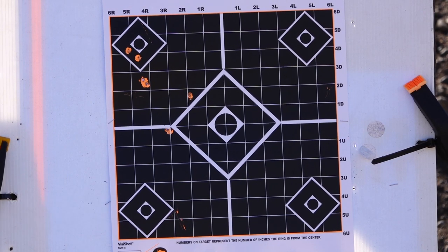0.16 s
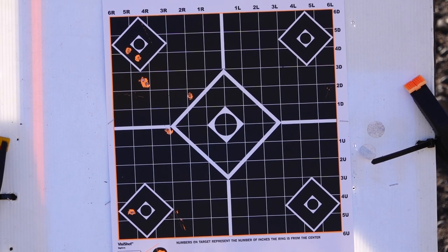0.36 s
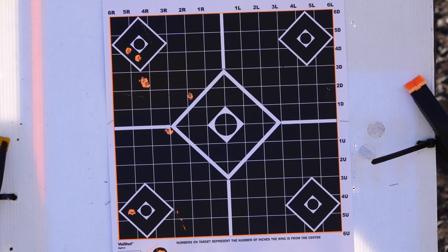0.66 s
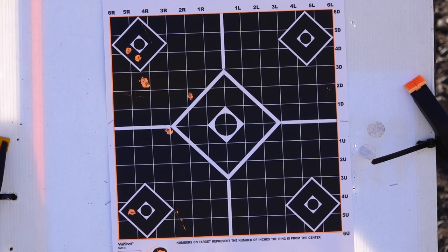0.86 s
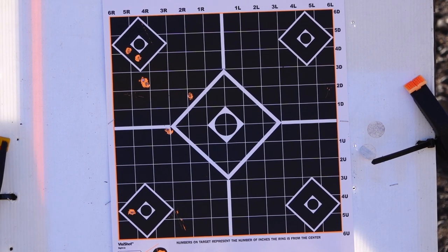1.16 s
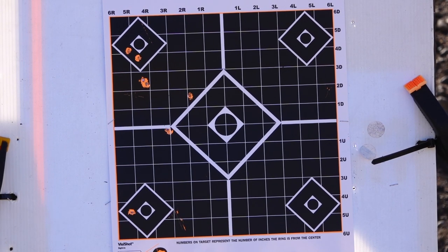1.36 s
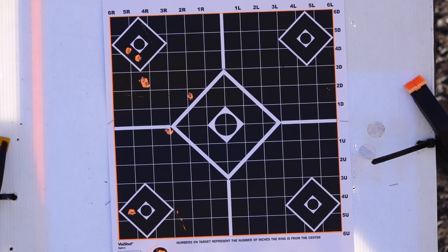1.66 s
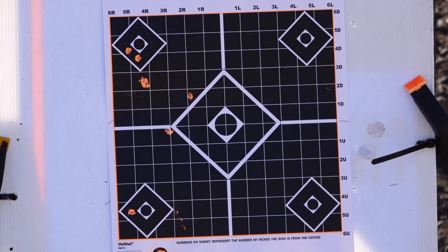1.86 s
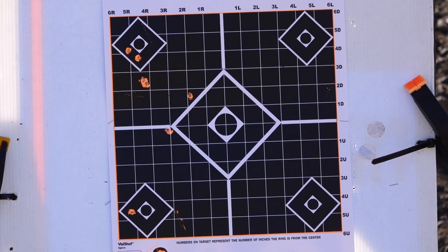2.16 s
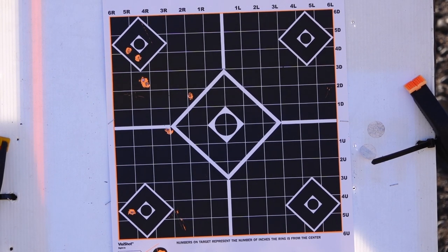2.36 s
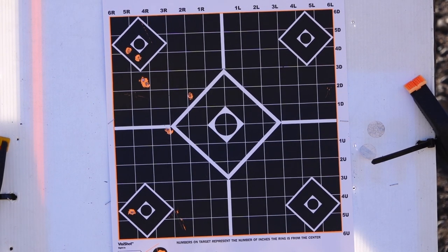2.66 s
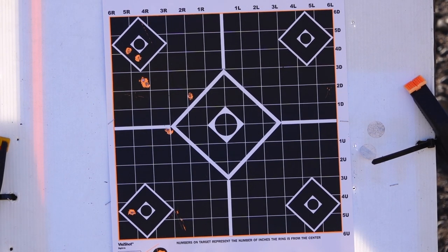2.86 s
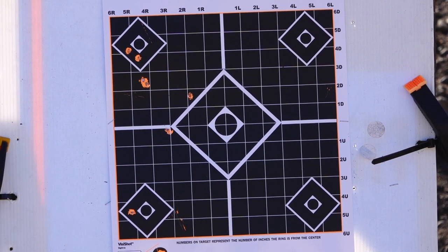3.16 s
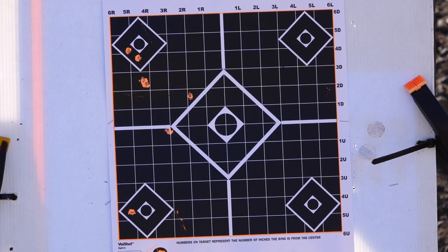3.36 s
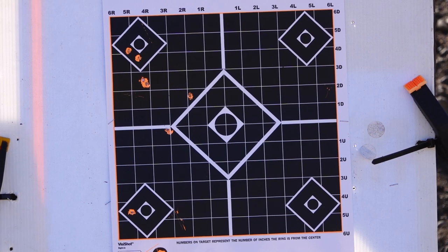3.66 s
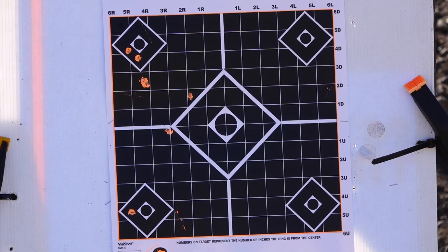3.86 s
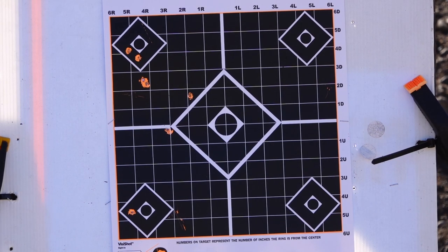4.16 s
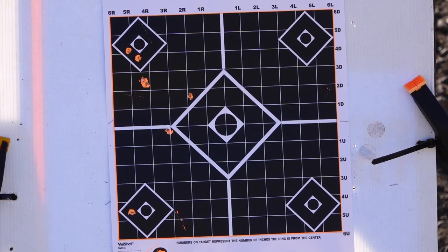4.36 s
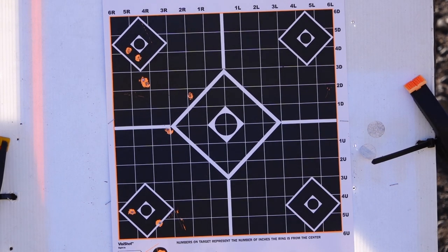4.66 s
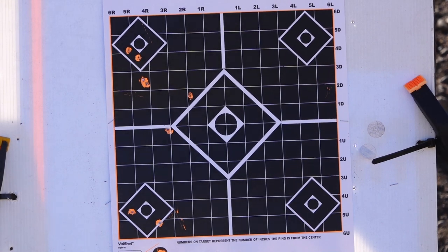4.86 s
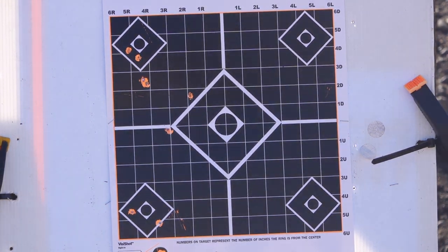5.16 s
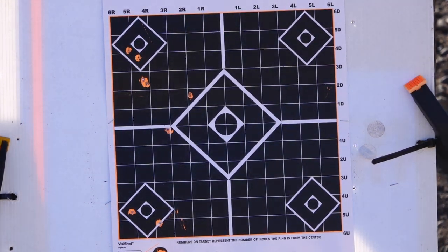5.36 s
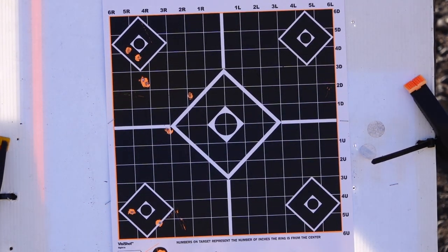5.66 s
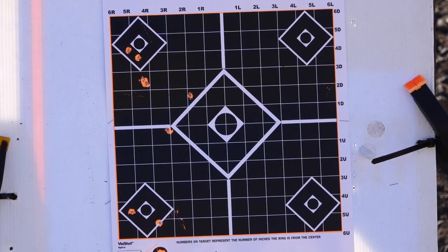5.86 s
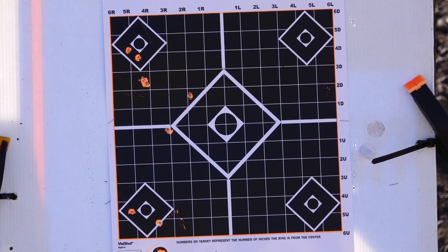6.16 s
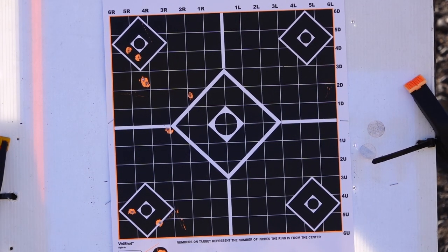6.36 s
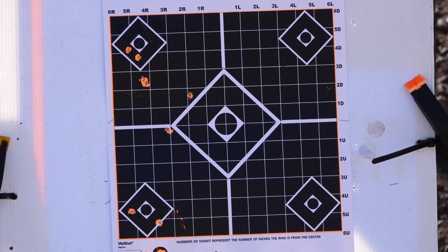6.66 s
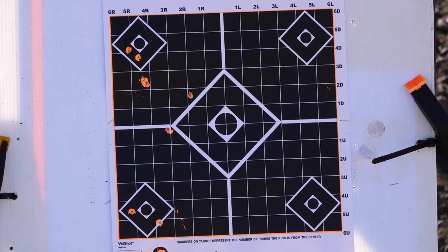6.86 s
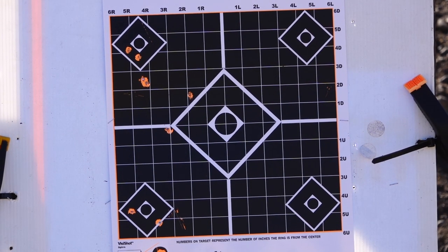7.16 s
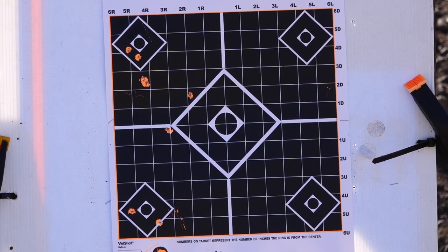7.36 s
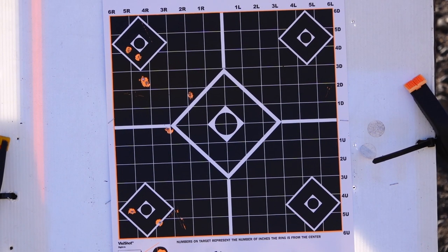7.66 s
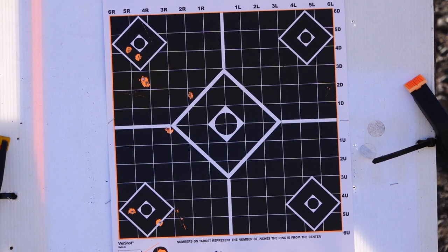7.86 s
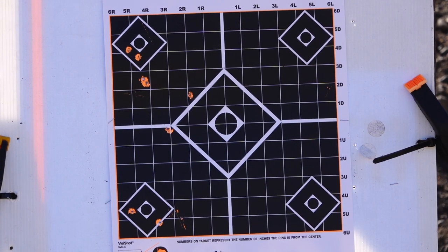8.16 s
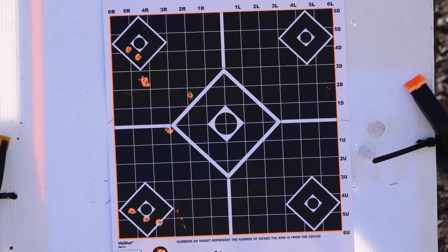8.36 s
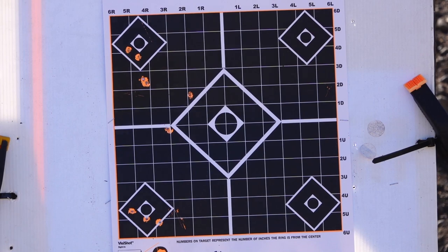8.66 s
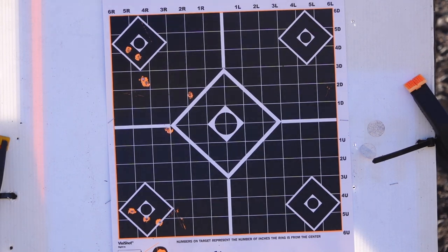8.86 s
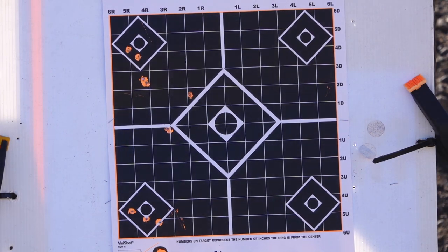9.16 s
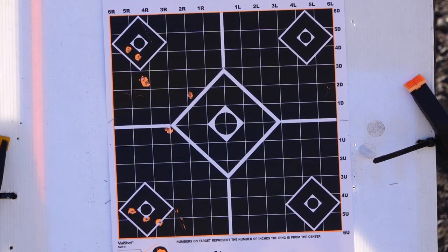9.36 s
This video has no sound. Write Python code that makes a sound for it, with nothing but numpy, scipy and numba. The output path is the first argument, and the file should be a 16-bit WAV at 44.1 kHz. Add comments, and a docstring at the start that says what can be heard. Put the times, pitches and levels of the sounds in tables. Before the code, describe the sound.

A small revolver is fired three times outdoors, close to the microphone, at about 0.4, 4.5 and 8.3 seconds. Each shot is a loud, sharp crack that overloads briefly, slaps back off nearby surfaces and trails away in a fainter, duller echo over about two seconds. The trigger clicks roughly 0.2 seconds after each shot. Then the hammer is cocked with a barely audible scrape and two crisp steel clicks plus smaller ticks, at about 1.2, 5.3 and 9.0 seconds. Small birds whistle very faintly in the distance from 2.2 to 4.1 seconds and chirp briefly again around 6.6. Low wind rumbles on the microphone, with soft thumps between 3.5 and 4 seconds; it holds until about 6.3, eases, then returns lightly toward the end at around 9.5 seconds. A very faint, distant rustle lies underneath throughout.

```python
"""Revolver at an outdoor range

A phone microphone stands beside a small revolver fired three times. Each blast overloads it, then
comes back off nearby boards, a bank and far trees, much the same every time, duller with distance.
Close up, the steel action clicks between shots and wind buffets the microphone.
Far off, small birds whistle over a faint rustle."""
import sys
import numpy as np
from scipy import signal
from scipy.fft import rfft, irfft, next_fast_len
from scipy.io import wavfile
from scipy.ndimage import uniform_filter1d
from numba import njit

SR = 44100
rng = np.random.default_rng(int(sys.argv[2]) if len(sys.argv) > 2 else 0)


def master(y):
    """Save y as 16-bit WAV."""
    cut = np.clip(np.atleast_2d(y).T, -1, 1)
    pcm = np.round(cut * 32767)  # scale
    wavfile.write(sys.argv[1], SR, pcm.astype(np.int16))


N = 418950

# spectrum of the distant rustle: freq_hz, gain_db
RUSTLE_SPECTRUM = [(88, -33.5), (150, -8.5), (291, -13.5), (334, -12), (805, -16), (1940, -22), (2400, -24),
                   (5050, -28.5), (16000, -33)]
# strength of the wind on the microphone: time_s, level_db
WIND_LEVELS = [(0, -63), (0.301, -58.5), (.75, -56), (2.3, -53.5), (2.999, -58), (3.299, -42.5),
               (3.701, -43), (3.851, -32), (4.151, -40.5), (4.35, -34), (4.751, -38.5), (4.88, -30),
               (5.299, -31), (6.249, -32), (7.2, -53.5), (7.348, -41.5), (7.901, -41.5), (9.5, -36)]
# single low buffets, and a low knock at 1.385 s: start_s, level_db, pitch_hz
LOW_THUMPS = [(1.385, -29, 290), (3.506, -17.5, 69.5), (3.857, -20, 93), (3.945, -23, 56.9),
              (6.85, -33, 69.8), (8.861, -25.5, 73.1)]
# whistled bird notes: start_s, length_s, level_db, first_hz, middle_hz, last_hz
BIRD_WHISTLES = [(2.219, .185, -59.5, 2350, 2353, 2175), (2.418, 0.035, -62, 1830, 1795, 1850),
                 (2.444, 0.092, -63, 1830, 2170, 2300), (2.52, 0.034, -60, 1850, 1840, 1920),
                 (2.551, 0.15, -60, 2000, 2340, 2530), (2.53, .08, -71, 4400, 3950, 3097),
                 (3.071, 0.083, -64, 3145, 3000, 2874), (3.278, 0.063, -56, 2870, 2816, 2890),
                 (3.289, 0.072, -62, 2260, 2850, 3480), (3.296, .1, -62, 1323, 1393, 1350),
                 (3.36, 0.044, -54.5, 2450, 2340, 2320), (3.385, 0.089, -60, 3600, 3690, 3900),
                 (3.46, 0.28, -62, 2730, 2620, 2545), (3.494, .06, -52, 2700, 2760, 2450),
                 (3.5, 0.055, -65, 5550, 5400, 4950), (3.708, 0.089, -60, 2820, 2660, 2260),
                 (3.723, 0.06, -66, 5390, 5300, 4880), (3.783, 0.069, -61, 2250, 2356, 2650),
                 (3.863, .27, -70, 2630, 2620, 2620), (6.501, .02, -62.5, 3630, 3780, 3800),
                 (6.612, 0.013, -54, 2370, 3700, 4950), (6.622, .034, -62, 5700, 5700, 5430),
                 (6.673, 0.04, -63, 1770, 1990, 2350)]
# raspy bird calls: start_s, length_s, level_db, first_hz, middle_hz, last_hz
BIRD_RASPS = [(6.52, 0.06, -61.5, 1207, 1443, 1490), (6.575, 0.039, -57, 1404, 1440, 1470)]
# modes of the steel frame: pitch_hz, level_db, t60_s
FRAME_MODES = [(1400, -24, 0.008), (2030, -20, 0.012), (3055, 9.5, 0.0076), (4250, 0, 0.006),
               (5380, 4, .006), (7600, -12, 0.0041), (9350, -32, 0.027), (10100, -15.5, 0.0047)]
# trigger let go, hammer drawn, hammer locks, grip settles twice: peak_db, tilt_db_per_octave, rattle_ms
ACTION_STEPS = [(3.5, -7.5, 1.17), (-0.2, 6.5, 1.22), (-0.5, -7, 2.06), (-19.5, -8, 1.52), (-31, -13, 0.8)]
# when those steps fall, a row a shot: trigger_s, draw_s, lock_s, settle_s, resettle_s
ACTION_TIMES = [(.5237, 1.1519, 1.2186, 1.3625, 1.4057), (4.6725, 5.241, 5.2998, 5.411, 5.4623),
                (8.4792, 8.989, 9.044, 9.182, 9.2258)]
# stray ticks of loose parts: start_s, peak_db, tilt_db_per_octave
LOOSE_TICKS = [(0.5473, -16.5, -3), (.551, -8, 8.5), (.5668, -22, -9), (0.5733, -11.5, -12),
               (1.066, -32.5, -8), (1.104, -32, 6), (1.3908, -30, 0), (1.4573, -31.5, -6),
               (4.6931, -12, -2), (4.6966, -5.5, 6), (4.7058, -12, -5), (5.202, -27.5, 0),
               (5.214, -30.5, 2), (8.498, -25, -9), (8.502, -16.5, 4), (8.5049, -14.5, -7),
               (8.8754, -22, 9), (8.959, -26, -4)]
# hammer fall ahead of each blast: lead_s, peak_db, tilt_db_per_octave
HAMMER_FALL = [(0.0105, -22.5, -6.5), (0.0022, -2.5, 0.6)]
# spectrum of the blast: freq_hz, gain_db
BLAST_SPECTRUM = [(60, -30), (280, -16.5), (450, -7), (900, -3), (2000, 0), (3100, -1), (3700, -3.5),
                  (4400, -2.5), (7000, -4.5), (15000, -19)]
# the muzzle's bright crack and darker body, then what scatters its blast: boards, open ground, shelter, bank
# face, bank top, # rising ground, far trees: delay_s, level_db, rise_db_per_s, hold_s, fall_db_per_s,
# tilt_db_per_octave
BLAST_PATHS = [(0.0005, 3, 9000.5, 0.002, 2500, 2.5), (.004, 3.5, 9000.5, 0.0086, 2100, -1),
               (0.034, -24.5, 902, .056, 600, 1.17), (0.105, -39.5, 300, .03, 149.5, 2),
               (0.062, -19, 1499.5, .012, 419.5, -1.5), (0.258, -26.5, 290.5, .012, 79.5, 2.5),
               (.35, -25.5, 110, .07, 200, -3.5), (0.47, -34, 61.5, .1, 36, -0.5),
               (1.1, -45.5, 45.5, .25, 24, -1.5)]
# distinct echoes off single surfaces: delay_s, level_db, centre_hz
SURFACE_ECHOES = [(.047, -0.5, 1150), (.0465, -1.5, 3100), (.054, -7, 4200), (.066, -16, 1000),
                  (.111, -17.5, 2540), (.121, -23.5, 2952), (.141, -28.5, 2370), (.252, -16, 577),
                  (.257, -11, 1860), (.292, -15, 1950), (.41, -27.5, 1211), (0.506, -24, 810),
                  (0.681, -31, 883), (.815, -32, 1110)]
# the shots: start_s, level_db, thump_db
GUNSHOTS = [(.351, 3.5, -7), (4.483, 4, -14.5), (8.283, 4, -12.5)]

RUSTLE_DB = -60.5
RASP_HARMONICS_DB, RASP_FLUTTER_DB = (-3, 3, 0), 2
SCRAPE_S, SCRAPE_HZ, SCRAPE_DB = 0.27, 2850, -50
RIDGE_DELAY_S, RIDGE_SPREAD_S, RIDGE_HZ, RIDGE_DB = 3.1, .3, 1280, -68
TAIL_S, AIR_LOSS_DB_PER_S = 2.9, 36.5  # loss at 8 kHz
LEAF_HZ, HOLLOW_HZ = 3620, 300  # the far trees return a leafy band and a low boom
ECHO_CYCLES, SMEAR_MS_PER_S = 1.9, 4.5  # an echo lasts a few cycles, longer from far away
PHONE_TOP_HZ = 15700


def undb(db):
    """Decibels to amplitude."""
    return 10 ** (np.asarray(db) / 20)


def unit(x):
    """Scales x to rms 1."""
    return x / np.sqrt(np.mean(x ** 2))


def add(out, x, start_s):
    """Mixes x into out from start_s."""
    i = int(start_s * SR)
    out[i:i + len(x)] += x[:len(out) - i]


def band(n, hz, octaves):
    """Noise of rms 1 in a bell-shaped band."""
    f = np.maximum(np.fft.rfftfreq(n, 1 / SR), 1)
    bell = np.exp(-(np.log2(f / hz) / octaves) ** 2)
    magnitude = bell * np.sqrt(rng.exponential(size=len(f)))
    return unit(irfft(magnitude * np.exp(2j * np.pi * rng.random(len(f))), n))


def walk(n, rate_hz):
    """Smooth random drift with a spread near 1."""
    hold = int(SR / rate_hz)
    steps = np.repeat(rng.standard_normal(n // hold + 1), hold)
    return 1.3 * uniform_filter1d(uniform_filter1d(steps, hold), hold)[:n]


def colour(x, spectrum):
    """Filters x by (freq_hz, gain_db) points."""
    hz, db = np.transpose(spectrum)
    f = np.maximum(np.fft.rfftfreq(len(x), 1 / SR), 1)
    return irfft(rfft(x) * undb(np.interp(np.log(f), np.log(hz), db)), len(x))


@njit
def lowpass(x, hz, damping):
    """State-variable low-pass with a moving corner."""
    y, band_state, low_state = np.empty(len(x)), 0., 0.
    for i in range(len(x)):
        g = np.tan(np.pi * hz[i] / SR)
        bandpassed = (band_state + g * (x[i] - low_state)) / (1 + g * (g + damping))
        y[i] = low_state + g * bandpassed
        band_state, low_state = 2 * bandpassed - band_state, 2 * y[i] - low_state
    return y


def distant_rustle():
    """Far across the range, a rustle swells over a smooth hiss."""
    out, swell = np.zeros(N), walk(N, .6)
    for hz in 150 * 2 ** np.arange(0, 7, .5):
        drift_db = (swell + walk(N, 4.8)) * min(800 / hz, 1)
        out += np.sqrt(hz) * undb(drift_db) * band(N, hz, 0.45)
    return undb(RUSTLE_DB) * unit(colour(out, RUSTLE_SPECTRUM))


def bird_note(length_s, pitches, harmonics_db):
    """The harmonics of one wavering note that bends through three pitches."""
    progress = np.arange(0, 1, 1 / length_s / SR)
    glide_hz = np.polyval(np.polyfit([0, .5, 1], pitches, deg=2), progress)
    turns = np.cumsum(glide_hz * (1 + .009 * walk(len(progress), 120))) / SR
    fade = np.clip(np.minimum(progress, 1 - progress) * length_s / 0.0021, 0, 1)
    return [fade * undb(db) * np.sin(2 * np.pi * k * turns) for k, db in enumerate(harmonics_db, 1)]


def far_birds():
    """Near-sine whistles and a raspier voice rich in harmonics, blurred by the trees."""
    out = np.zeros(N)
    for start_s, length_s, db, *pitches in BIRD_WHISTLES:
        add(out, bird_note(length_s, pitches, [db])[0], start_s)
    for start_s, length_s, db, *pitches in BIRD_RASPS:
        harmonics = bird_note(length_s, pitches, db + np.array(RASP_HARMONICS_DB))
        n = len(harmonics[0])
        breath = undb(db) * band(n, 2570, 0.9) * np.hanning(n)
        voice = sum(x * undb(RASP_FLUTTER_DB * walk(n, 120)) for x in harmonics)
        add(out, breath + voice, start_s)
    out *= undb(3 * walk(N, 90) - 2)  # notes break up on the way
    trees = rng.standard_normal(SR // 2) * 1000. ** (-np.arange(SR // 2) / SR / 0.4)
    return out + undb(-41) * signal.fftconvolve(out, trees)[:N]


def thump(db, hz):
    """A cycle or two of low-pitched pressure on the microphone."""
    turns = np.arange(0, 5, hz / SR)
    return undb(db) * np.sin(2 * np.pi * turns) * 2 * turns * np.exp(1 - 2 * turns)


def wind_on_microphone():
    """Eddies thump the microphone port in lumps; faster air reaches higher."""
    gust_db = np.interp(np.arange(N) / SR, *np.transpose(WIND_LEVELS)) + 3.2 * walk(N, 16)
    corner_hz = np.clip(55 * undb(0.2 * (gust_db + 38.5)), 15, 300)
    rumble = lowpass(rng.standard_normal(N), corner_hz, damping=0.89)
    rumble = lowpass(rumble, 2.2 * corner_hz, damping=1.2)
    out = unit(rumble / np.sqrt(corner_hz)) * undb(gust_db)
    for start_s, db, hz in LOW_THUMPS:
        add(out, thump(db, hz), start_s)
    return out


def steel_click(peak_db, tilt, rattle_ms=1.1):
    """Steel parts meet in a brief rattle that rings the frame; the bench sends back a faint smear."""
    t = np.arange(3000) / SR
    contact = rng.standard_normal(len(t)) * np.exp(-(1000 * t / rattle_ms - 1) ** 2)
    contact[50] += 6.0  # the main blow
    ring = np.zeros(len(t))
    for hz, db, t60_s in FRAME_MODES:
        detune, stray_db = rng.standard_normal(2) * [.015, 2]  # no two blows ring alike
        gain = undb(db + stray_db + tilt * np.log2(hz / 3000))
        ring += gain * np.sin(2 * np.pi * hz * (1 + detune) * t) * 1000. ** (-t / t60_s)
    snap = band(len(t), 4000, 0.8) * np.exp(-((t - .0016) / 0.002) ** 2)
    click = unit(np.convolve(contact, ring)[:len(t)]) + undb(-8) * unit(snap)
    click = signal.lfilter(*signal.butter(2, 1600, "high", fs=SR), click)  # small parts give little bass
    smear = undb(-40) * band(len(t), 5000, 1.6) * np.exp(-((t - .010) / 0.0084) ** 2)
    return undb(peak_db) * (click / np.abs(click).max() + smear)


def cylinder_scrape():
    """The cylinder drags round, steel on steel: a rough narrow hiss that swells and fades."""
    n = int(SCRAPE_S * SR)
    return undb(SCRAPE_DB + 3.5 * walk(n, 90)) * band(n, SCRAPE_HZ, 0.14) * np.sqrt(np.hanning(n))


def revolver_action():
    """Close to the microphone, the gun is cocked after each shot and loose parts tick."""
    out = np.zeros(N)
    for times in ACTION_TIMES:
        add(out, cylinder_scrape(), times[1] - SCRAPE_S)  # ends as the hammer comes back
        for start_s, step in zip(times, ACTION_STEPS):
            add(out, steel_click(*step), start_s)
    for start_s, peak_db, tilt in LOOSE_TICKS:
        add(out, steel_click(peak_db, tilt), start_s)
    return out


def ridge_echo():
    """A distant ridge returns the blast as a soft, lumpy swell, centred 1 s in."""
    t = np.arange(2 * SR) / SR - 1
    lumps = sum(undb(5.5 * walk(len(t), 33.03)) * band(len(t), RIDGE_HZ * 2 ** octave, 0.39)
                for octave in (-.5, .5))
    return undb(RIDGE_DB) * unit(lumps) * np.exp(-(t / RIDGE_SPREAD_S) ** 2)


def surface_echoes(n):
    """Single surfaces each slap back a short burst, narrower in band from farther away."""
    out = np.zeros(n)
    for delay_s, db, hz in SURFACE_ECHOES:
        width_s = ECHO_CYCLES / hz + SMEAR_MS_PER_S * delay_s / 1000
        u = np.arange(-2, 5, 1 / width_s / SR)  # widths from the peak
        envelope = np.exp(-np.where(u < 0, 2 * u ** 2, u))  # steep front, slower tail
        burst = band(4096, hz, 0.88 / (1 + 2.5 * delay_s))[:len(u)] * envelope
        add(out, undb(db) * burst / np.abs(burst).max(), delay_s - 2 * width_s)
    return out


def blast(shared_patch_db, band_patch_db):
    """One blast and its returns: uneven ground scatters it in patches, the air eats the treble."""
    n = next_fast_len(int(TAIL_S * SR))
    t = np.arange(n) / SR
    envelopes = [undb(db - rise * np.maximum(delay - t, 0) - fall * np.maximum(t - delay - hold, 0))
                 for delay, db, rise, hold, fall, _ in BLAST_PATHS]
    tilts = [path[-1] for path in BLAST_PATHS]
    tree_share = np.clip((t - .95) / 0.1, 0, 1)
    out, shared_db = np.zeros(n), shared_patch_db * walk(n, 70)
    for hz in 60 * 2 ** np.arange(0, 8.1, .4):
        power = sum((x * undb(tilt * np.log2(hz / 1000))) ** 2 for x, tilt in zip(envelopes, tilts))
        air_db = AIR_LOSS_DB_PER_S * t * (hz / 8000) ** 1.5
        patch_db = shared_db + band_patch_db * walk(n, 40)
        patch_db *= min(1500 / hz, 1) * (1 - 0.34 * tree_share)  # treble and far returns are more even
        out += np.sqrt(power) * undb(patch_db - air_db) * band(n, hz, .3) / 3
    leaves = undb(-3.5 - 12.7 * t) * band(n, LEAF_HZ, 0.2)
    boom = undb(-1.46) * band(n, HOLLOW_HZ, 0.24)
    out += tree_share * envelopes[-1] * (leaves + boom)
    fade = np.clip(np.minimum(t / .0003, (t[-1] - t - .1) / .2), 0, 1)
    return colour(out, BLAST_SPECTRUM) * fade + surface_echoes(n)


def revolver_shots():
    """The hammer falls and each blast meets the same surroundings; moving air changes a little of it."""
    out, steady = np.zeros(N), blast(shared_patch_db=3.2, band_patch_db=2.8)
    for start_s, db, thump_db in GUNSHOTS:
        varying = 0.51 * blast(shared_patch_db=1.0, band_patch_db=2.4)
        add(out, undb(db) * (steady + varying), start_s)
        # the pressure wave rocks the microphone
        add(out, thump(thump_db - 4, hz=51), start_s)
        add(out, thump(thump_db + 4.5, hz=170), start_s)
        for lead_s, peak_db, tilt in HAMMER_FALL:
            add(out, steel_click(peak_db, tilt), start_s - lead_s)
        if start_s + RIDGE_DELAY_S < N / SR:
            add(out, undb(db) * ridge_echo(), start_s + RIDGE_DELAY_S - 1)
    return out


def scene():
    """The range in mono, from beside the gun."""
    return (revolver_shots() + revolver_action() + far_birds() + wind_on_microphone()
            + distant_rustle())[None]


def record(dry):
    """The phone's input clips, its gain control pulls sustained overload down, and the top is cut."""
    clipped = np.clip(dry, -1, 1)
    pole = np.exp(-1 / (0.0025 * SR))
    power = signal.lfilter([1 - pole], [1, -pole], clipped ** 2)
    ducked = clipped / (1 + (power / 0.7) ** 2.5)
    return signal.sosfilt(signal.ellip(10, .2, 55, PHONE_TOP_HZ, fs=SR, output="sos"), ducked)


dry = scene()
out = record(dry)
master(out)
```